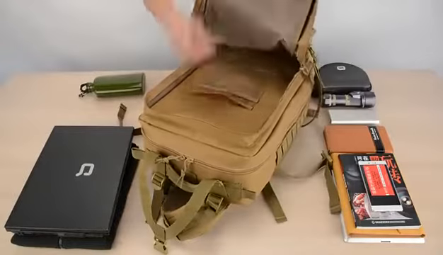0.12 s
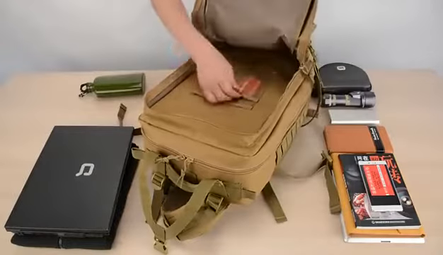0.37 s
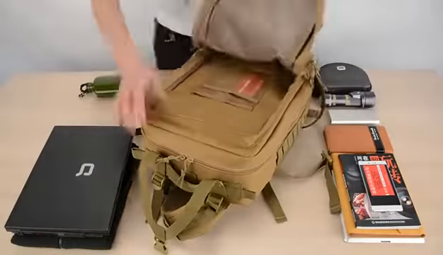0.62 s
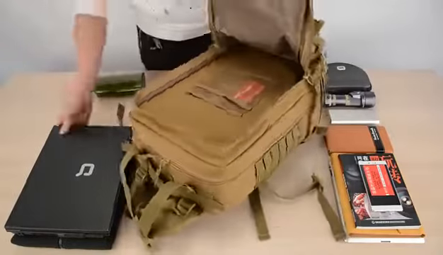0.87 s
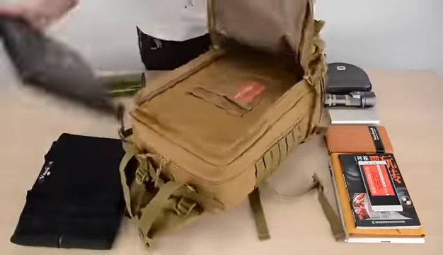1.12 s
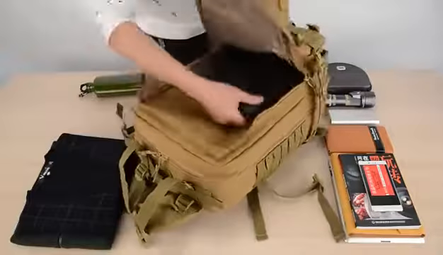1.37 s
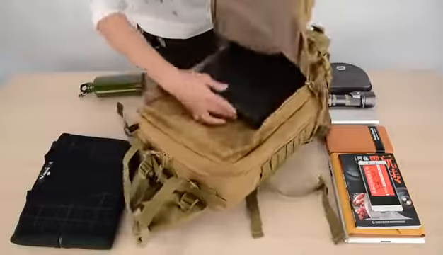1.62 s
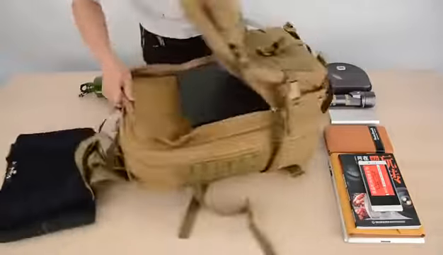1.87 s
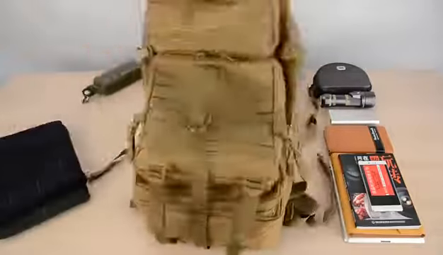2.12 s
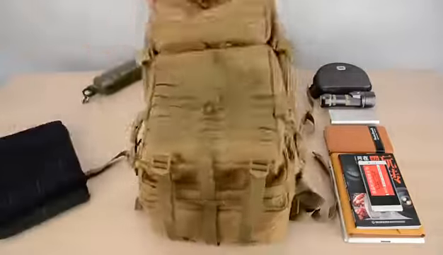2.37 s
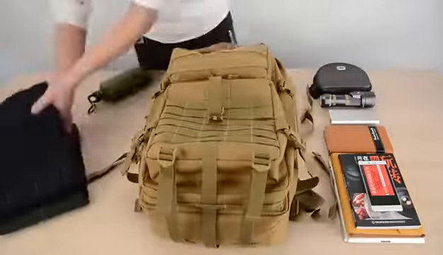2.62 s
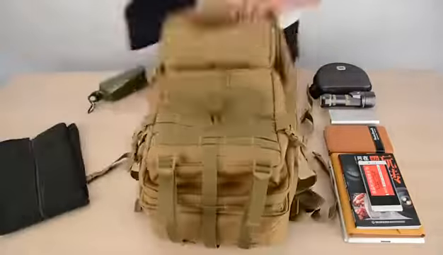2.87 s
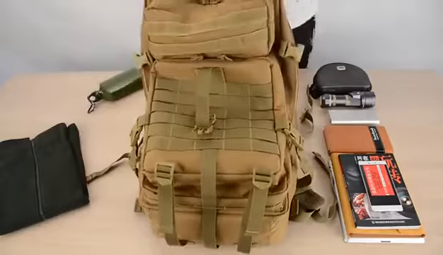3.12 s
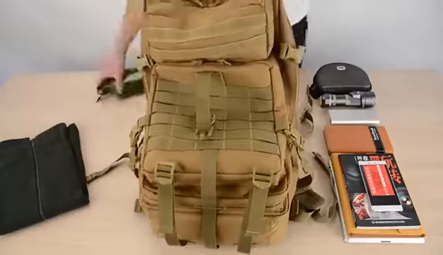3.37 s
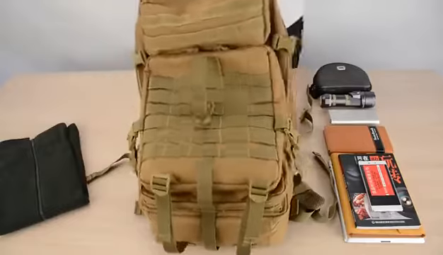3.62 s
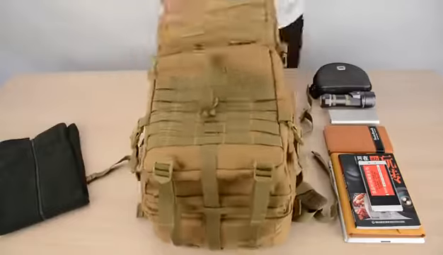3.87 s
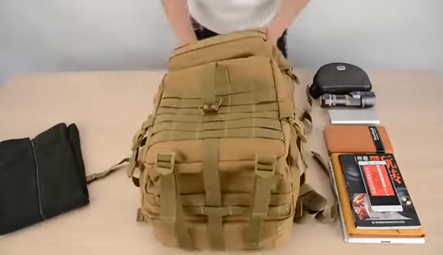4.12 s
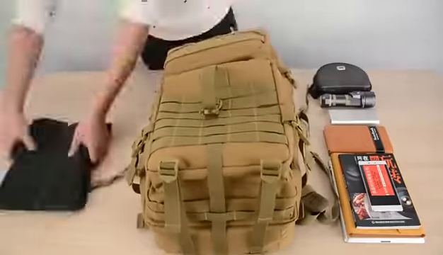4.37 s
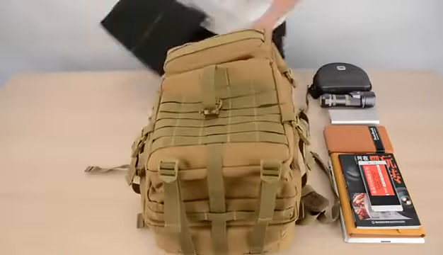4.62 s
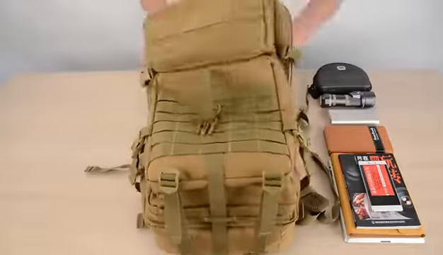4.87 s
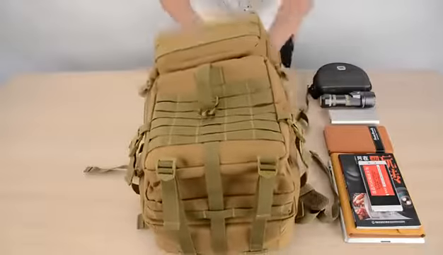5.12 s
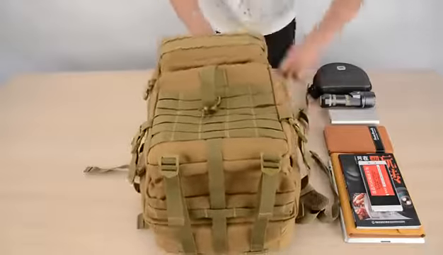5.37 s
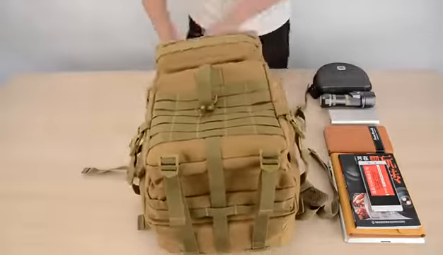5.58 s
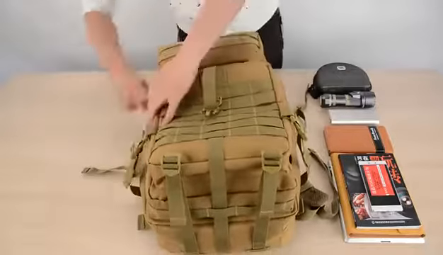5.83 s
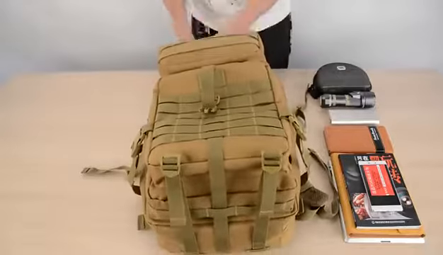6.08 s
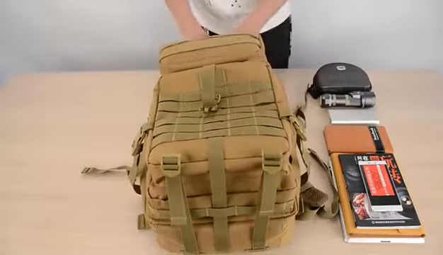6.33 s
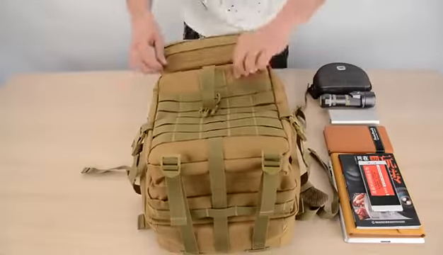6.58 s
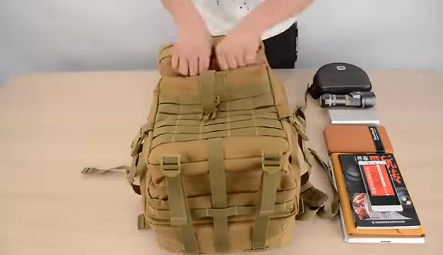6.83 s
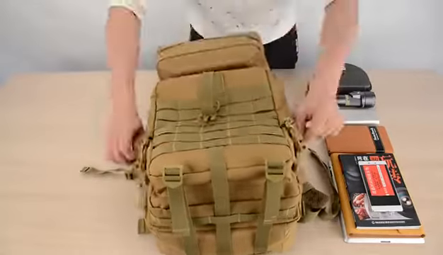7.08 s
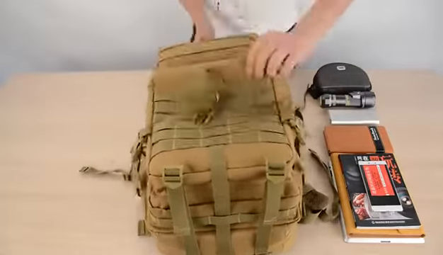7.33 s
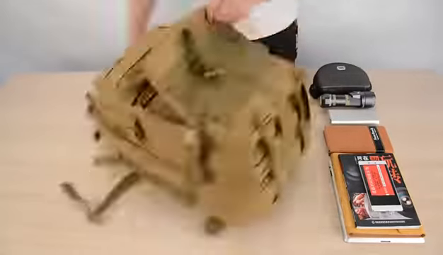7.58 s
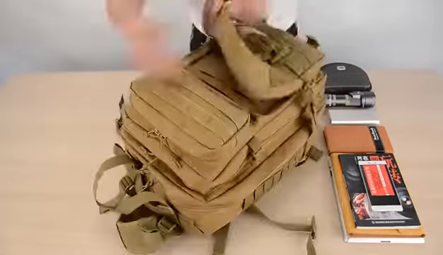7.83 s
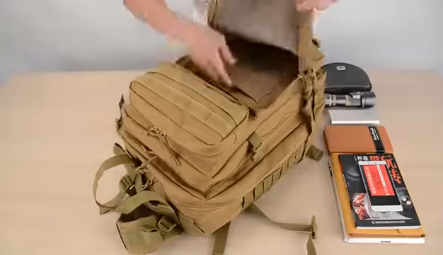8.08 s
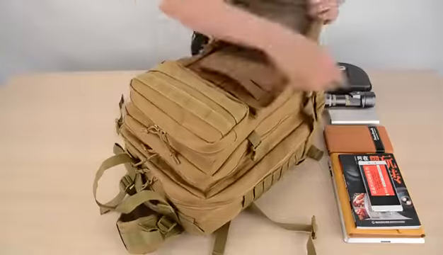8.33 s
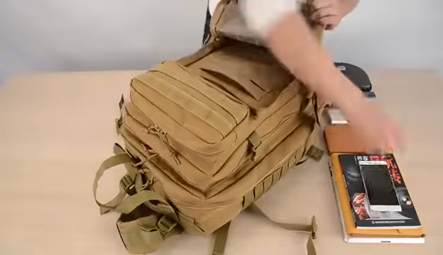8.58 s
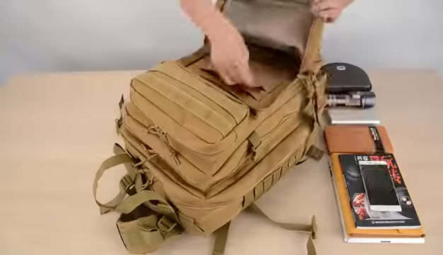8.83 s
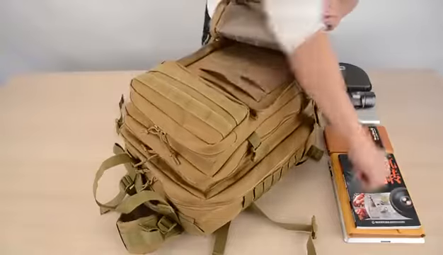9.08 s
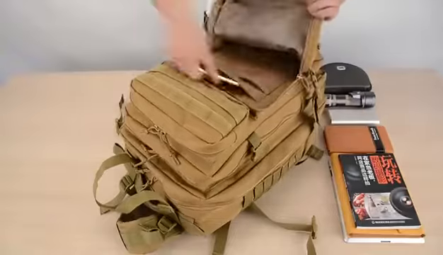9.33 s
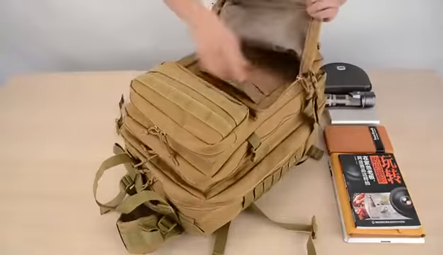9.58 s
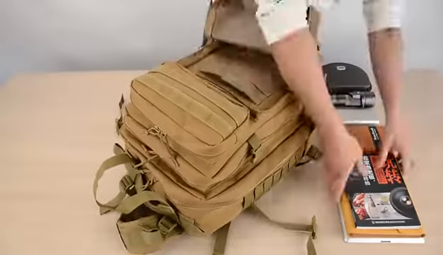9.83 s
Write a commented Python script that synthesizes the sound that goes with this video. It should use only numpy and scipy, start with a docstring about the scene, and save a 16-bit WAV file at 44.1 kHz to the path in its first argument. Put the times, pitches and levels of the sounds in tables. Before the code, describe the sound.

Sped-up hands pack a stiff nylon backpack on a wooden table in a small, hard room. From 0 to 1.7 s, dry crackling cloth rubs come with small clicks, including a sharper knock near 1.5. At 1.8-2.1 the bag is dragged, landing with a bright metal bottle clank and tiny rattle. Softer rustles and ticks follow, with a hard snap at 3.0 and a crisp scrape near 3.4. From 3.6 to 5.2 handling is lighter. Around 5.4-5.9, strong rubs and rapid zip whirrs burst out; shorter ones continue at 6.2-6.3. Vigorous scrapes and a knock come at 6.9-7.1, then dense clicks and a harsh drag at 7.4-7.8. Knocks near 8.1 give way to sparse clicks, quiet rustling and small zip rubs around 9.4. Thin mono microphone, little bass, faint hiss and drone, weak whistles at the end.

```python
"""Packing a stiff nylon backpack

Sped-up (time-lapse) sound of hands packing the bag on a wooden table in a small hard room, one thin microphone.
Cloth scrapes and crackles (dense random snaps, coloured), zips whirr (a gliding tone with overtones).
Buckles and packed things click and knock (damped rings); cloth resonances and short whirrs are noise bands.
A metal bottle clanks (decaying sines); thin whistles, hiss and a faint drone (shaped noise) lie behind.
"""
import sys
import numpy as np
from scipy import signal
from scipy.io import wavfile
from scipy.ndimage import uniform_filter1d

SR = 44100
rng = np.random.default_rng(int(sys.argv[2]) if len(sys.argv) > 2 else 0)


def put_to_file(sound):
    """Save the sound as 16-bit audio at rate SR, in the file named by the first command-line argument."""
    columns = np.atleast_2d(sound).T  # one column per channel
    safe = np.clip(columns, -1, 1)
    whole_steps = np.round(safe * 32767)
    wavfile.write(sys.argv[1], SR, whole_steps.astype(np.int16))


def nominal_scale(level):
    """Amplitude ratio for a level in decibels (scalar or array-like)."""
    x = np.asarray(level, float) / 20
    return 10 ** x


N = 438794

# Hand sweeps over the cloth: (loudest [s], swell [s], fade [s], level [dB], brightness [dB])
STROKES = [(.05, 0.094, 0.039, -45.5, 1), (.138, 0.024, 0.026, -38, 3.5), (.36, .1, 0.091, -50.5, 2),
           (0.598, 0.18, 0.14, -46, 3.5), (.742, .1, 0.043, -41, 0.5), (.87, 0.088, 0.096, -39, 5),
           (1.097, 0.018, 0.036, -46.5, 3.5), (1.369, 0.059, 0.09, -34, 0.5),
           (1.605, 0.25, 0.043, -46.5, 1.5), (1.702, 0.079, 0.082, -40.5, 2), (2.327, 0.083, .12, -50, 2),
           (2.397, 0.037, .1, -41.5, 0), (2.48, 0.026, .05, -44, 1.5), (2.91, 0.24, 0.55, -45, 1),
           (3.366, 0.013, 0.087, -31.5, 4.5), (3.618, 0.078, .2, -41, 2), (3.81, 0.043, 0.046, -41.5, -3),
           (3.872, .06, 0.033, -42.5, 2.5), (4.099, 0.06, 0.052, -42, -0.5), (4.224, 0.074, .08, -40, 2),
           (4.413, 0.083, 0.21, -43, 2.5), (4.83, .1, 0.18, -48, -0.5), (5.378, 0.027, 0.073, -29, 3.5),
           (5.405, 0.041, 0.085, -25.5, 3.5), (5.582, 0.022, 0.076, -29, 1.5),
           (5.849, 0.04, 0.062, -30, 4.5), (5.885, 0.037, 0.044, -29.5, 3), (5.95, 0.081, 0.041, -37.5, -1),
           (6.15, 0.024, 0.035, -43.5, -0.5), (6.192, .02, .045, -34, 4.5), (6.325, 0.024, 0.018, -32, -2),
           (6.706, 0.0097, 0.062, -37, 2), (6.854, 0.44, 0.9, -43.5, -6), (6.91, 0.016, 0.11, -34.5, 2.5),
           (6.95, 0.044, .08, -28.5, 4), (6.995, .08, .045, -30.5, 4), (7.055, 0.025, 0.073, -28, 3),
           (7.11, .09, 0.068, -31.5, 3.5), (7.343, 0.033, .3, -43.5, -0.5), (7.485, 0.12, .3, -40.5, 0),
           (7.912, 0.13, .09, -41.5, -1), (8.151, 0.038, 0.071, -36, -2), (8.329, 0.027, 0.029, -44.5, 0),
           (8.796, 0.035, .06, -38.5, 2), (9.347, 0.067, 0.11, -46, -3), (9.444, 0.063, 0.22, -39, 2.5),
           (9.493, 0.075, 0.029, -44.5, -11), (9.566, 0.031, 0.027, -36.7, 0.)]
# Cloth jerked taut or slapped: (time [s], fade [s], level [dB], brightness [dB])
JOLTS = [(0.513, 0.012, -34.5, -3.5), (1.029, .055, -40, 6), (1.292, 0.026, -36, -2.5),
         (1.472, 0.038, -28, -0.5), (2.05, 0.2, -29, 3.5), (2.09, 0.079, -25, 5.5), (2.914, .03, -35.5, 1),
         (3.037, 0.047, -31, 3.5), (3.555, 0.051, -34.5, 1), (4.615, 0.24, -41, 1),
         (5.708, 0.039, -37.5, 2.5), (7.302, 0.037, -42, 0.5), (7.42, 0.038, -30, 4.5),
         (8.078, 0.041, -36.5, -3.5), (8.13, 0.17, -38, -2.5)]
# Whole bag dragged round on the table: (start [s], end [s], level [dB], brightness [dB])
DRAGS = [(1.773, 2.067, -34, 3.5), (7.54, 7.806, -29.5, 5)]
# The bag never rests: (time [s], fidgeting level [dB])
FIDGET = [(0, -51.5), (.5, -50), (1.2, -49), (1.6, -48), (2.3, -56), (2.6, -51), (3.2, -51), (4, -49.5),
          (4.7, -53), (5.3, -46.5), (5.75, -46.5), (6.05, -48.5), (6.5, -47.5), (7.26, -56.5), (8, -46.5),
          (8.4, -49.5), (9.3, -49), (9.95, -50.5)]
# Cloth colour, relative: (frequency [Hz], level [dB])
CLOTH_COLOUR = [(60, -47.5), (250, -31.5), (500, -8.5), (1000, -3), (2000, 1), (3300, 1.5), (5000, 0.5),
                (7600, -1)]
# Clicks and knocks: (time [s], blow peak [dB], pitch of struck part [Hz], tail re blow peak [dB])
KNOCKS = [(0.0483, -31.5, 5220, -4), (0.1351, -35, 5500, -12), (0.5134, -34, 4200, -2.5),
          (0.711, -29, 5530, -12), (1.0262, -22.5, 4400, -15), (1.289, -21.5, 2840, -21),
          (1.3714, -19, 4180, -14), (1.4706, -12, 4970, -27), (1.6485, -28, 5950, -9),
          (2.0497, -19, 3320, -19), (2.3481, -22, 5860, -15), (2.396, -18.5, 5000, -26),
          (2.838, -33, 3010, -7.5), (2.8613, -21, 2520, -20), (2.9113, -22, 3770, -17),
          (2.9392, -21.5, 3490, -23), (3.032, -7, 2650, -22), (3.0343, -10.5, 6540, -17.5),
          (3.2838, -23.5, 4930, -27), (3.5523, -30, 2870, -9), (3.6164, -18.5, 5400, -17),
          (3.671, -29, 5850, -6), (3.7777, -20.5, 5980, -18), (3.8038, -24.5, 3580, -14.5),
          (4.097, -29, 5400, -20), (4.1809, -39, 4220, -28), (4.6116, -27.5, 4200, -10),
          (4.684, -24, 5700, -31), (4.7144, -25, 4370, -24), (5.178, -28, 5060, -14),
          (5.5737, -18, 3870, -6), (5.7054, -28, 3600, -12), (5.7663, -32, 2730, -12),
          (6.0424, -21, 4460, -18.5), (6.4764, -29, 3090, -9), (6.8513, -19, 4720, -12),
          (7.1171, -12, 2140, -21), (7.3086, -17, 2920, -16.5), (7.3442, -20, 4570, -20),
          (7.4185, -20, 7150, -23), (7.4634, -21, 4530, -16), (7.482, -15, 4090, -19),
          (7.5351, -6, 6440, -20), (7.5494, -21, 6600, -12), (7.8858, -28, 2700, -13),
          (7.9052, -21.5, 2780, -13.5), (8.0773, -12.5, 2880, -19), (8.1444, -11.5, 3840, -9),
          (8.3035, -19.5, 3600, -18), (8.6077, -26.5, 7400, -11.5), (8.7918, -21, 5460, -18),
          (8.9219, -24.5, 1360, -27), (9.3025, -27.5, 1210, -15), (9.485, -28, 2900, -17),
          (9.5621, -28, 2200, -12), (9.745, -26.5, 2800, -15)]
# Zip pulls or rubs across ribbed webbing:
# (fastest [s], speeding up [s], slowing [s], top tooth rate [Hz], level [dB])
PULLS = [(5.402, .03, 0.074, 2425, -31.5), (5.868, 0.045, 0.046, 2554, -25),
         (6.197, 0.022, 0.025, 1142, -41), (6.334, 0.035, 0.026, 2240, -38),
         (6.935, 0.047, 0.063, 2240, -45), (7.115, .12, 0.041, 1194, -40), (9.347, .016, 0.024, 2484, -33),
         (9.442, 0.018, 0.021, 1347, -37.5)]
# Tooth-rate overtones: (multiple [1], level [dB])
TOOTH_OVERTONES = [(1, -5.5), (2, -19), (3, -18.5)]
# Narrow noisy bands, cloth resonances and short zip whirrs of nearly steady pitch:
# (start [s], end [s], frequency [Hz], width [Hz], level [dB])
NARROW_BANDS = [(.845, .925, 4440, 500, -43.5), (3.033, 3.08, 2570, 440, -42),
                (3.033, 3.06, 4960, 500, -42), (3.355, 3.39, 1960, 352, -38),
                (5.385, 5.425, 4380, 710, -29), (5.574, 5.605, 3860, 920, -24.5),
                (5.585, 5.61, 2500, 250, -29.5), (5.598, 5.64, 1770, 220, -37.5),
                (6.178, 6.215, 4360, 800, -38), (6.31, 6.348, 4630, 900, -36),
                (6.93, 6.97, 4700, 607, -31.5), (7.07, 7.11, 2230, 302, -34), (7.55, 7.7, 6820, 690, -31.5),
                (8.155, 8.212, 4280, 250, -37.5), (8.315, 8.36, 4040, 400, -46),
                (9.486, 9.506, 2170, 300, -40.5)]
# Bottle modes, relative: (frequency [Hz], level [dB], t60 [s])
BOTTLE_MODES = [(5320, -1.5, 0.046), (5570, 6, .07), (6960, 5, 0.045), (7600, -5, .06)]
# Blows on the bottle, relative: (time [s], blow [dB])
CLANKS = [(2.0827, -13), (2.084, -20), (2.091, -24), (2.099, -15), (2.108, -17), (2.149, -25)]
# The bag lands on the table, one row: (time [s], level [dB], frequency [Hz], t60 [s])
THUMP = (2.082, -37, 260, .012)
# Thin faint tones: (start [s], end [s], frequency [Hz], level [dB])
WHISTLES = [(3.18, 3.27, 6400, -52), (9.82, 9.87, 5715, -57), (9.875, 9.95, 5715, -52),
            (9.83, 9.92, 6654, -56), (9.86, 9.95, 2223, -56), (9.83, 9.94, 4436, -59),
            (9.38, 9.42, 690, -51)]
# Room decay: (frequency [Hz], t60 [s])
ROOM_DECAY = [(500, 0.26), (2000, 0.083), (7000, 0.062)]
# Hiss density, relative: (frequency [Hz], level [dB per Hz])
HISS_COLOUR = [(15, -51.5), (25, -29.5), (182, -14), (220, -20), (323, -5), (534, -7.5), (1180, -8),
               (1490, -1), (2040, 0), (3210, -7.5), (4280, -8.5), (4600, -3.5), (7600, -16), (9880, -39),
               (16700, -120)]
# Faint drone of the room: (frequency [Hz], level [dB])
HUM = [(100, -86), (199, -82), (312, -79), (361, -77), (415, -73), (592, -72), (694, -73), (840, -70)]

HISS_DB = -55
EDGE_HZ = 7700
LOW_CUT_HZ = 526  # handling sounds keep little bass below this
SWING_DB, JOLT_RISE_S = 15, 0.005  # swell and fade times span about SWING_DB
ROUND = 0.07  # bluntness of a stroke's top
DRAG_SAG_DB_PER_S, DRAG_FADE_S = 13, 0.063  # a drag tires, then stops
# Brightness lowers folds below 3.3 kHz and raises weave above 4 kHz by these shares
FIDGET_BRIGHT_DB, FOLDS_SHARE, WEAVE_SHARE = -2.5, 1.09, 0.7
SLOWEST, SLOW_DB = 0.5, -8  # speed re top and level change at both ends of a pull


def evened(x):
    """Scales to rms 1."""
    return x / np.sqrt(np.mean(abs(x) ** 2) + 1e-20)


def read(points, hz):
    """Interpolates a table on a log-frequency axis."""
    f, value = np.transpose(points)
    return np.interp(np.log(hz + 1), np.log(f + 1), value)


def add(mix, start_s, sound):
    """Mixes a sound in at start_s."""
    part = mix[round(start_s * SR):][:len(sound)]
    part += sound[:len(part)]


def resonate(x, hz, width_hz):
    """Resonance of gain 1: shift hz to zero, one-pole low-pass, shift back."""
    turn = np.exp(2j * np.pi * np.cumsum(hz * np.ones(len(x))) / SR)
    r = np.exp(-np.pi * width_hz / SR)
    return 2 * (turn * signal.lfilter([1 - r], [1, -r], x / turn)).real


def patches(shape, bins, frames):
    """Blotchy random field of rms 1 over frequency and time."""
    field = rng.standard_normal(shape[::-1]).T
    return evened(uniform_filter1d(uniform_filter1d(field, bins, 0), frames, 1))


def bands(rows, taper):
    """Narrow bands of noise that swell and fade."""
    out = np.zeros(N)
    noises = rng.standard_normal((len(rows), SR // 4))
    for (start_s, end_s, hz, width_hz, db), noise in zip(rows, noises):
        count = round((end_s - start_s) * SR)
        ringing = resonate(resonate(noise, hz, width_hz), hz, width_hz)
        tone = evened(ringing[-count:])  # resonance already built up
        add(out, start_s, nominal_scale(db) * tone * signal.windows.tukey(count, taper))
    return out


def hump_db(t, peak_s, swell_s, fade_s):
    """Level bump of a rub: blunt top, straight flanks in dB."""
    away = np.where(t < peak_s, (peak_s - t) / swell_s, (t - peak_s) / fade_s)
    return -SWING_DB * (np.hypot(away, ROUND) - ROUND)


def rubbing(t):
    """Cloth gain and brightness: strokes, jolts and drags add power to the fidgeting."""
    parts = [(np.interp(t, *np.transpose(FIDGET)), FIDGET_BRIGHT_DB)]
    for s, swell_s, fade_s, db, bright_db in STROKES:
        parts.append((db + hump_db(t, s, swell_s, fade_s), bright_db))
    for s, fade_s, db, bright_db in JOLTS:
        parts.append((db + hump_db(t, s, JOLT_RISE_S, fade_s), bright_db))
    for start_s, end_s, db, bright_db in DRAGS:
        sag_db = hump_db(t, start_s, JOLT_RISE_S, SWING_DB / DRAG_SAG_DB_PER_S)
        stop_db = hump_db(t, end_s, np.inf, DRAG_FADE_S)
        parts.append((db + sag_db + stop_db, bright_db))
    power = np.array([nominal_scale(db) ** 2 for db, _ in parts])
    total = power.sum(0)
    return np.sqrt(total), np.array([bright_db for _, bright_db in parts]) @ power / total


def cloth(snaps_hz=12000.0, spread_db=1.5, clump_db=1.0, patchy_db=1.5, streak_db=2.8):
    """Weave threads slip in dense uneven snaps; folds and weave set the colour."""
    s = np.arange(0, N, 32) / SR
    level, bright_db = rubbing(s)
    snaps = (rng.random(N) < snaps_hz / SR) * rng.standard_normal(N)
    snaps = snaps * nominal_scale(spread_db * np.minimum(rng.exponential(1, N), 4))
    hz, t, z = signal.stft(snaps, SR, nperseg=256, noverlap=192)

    folds = np.clip(np.log2(3300 / (hz + 1)), 0, 1.3)[:, None]
    weave = np.clip(np.log2((hz + 1) / 4000) * 2.07, 0, 1.2)[:, None]
    tilt_db = (WEAVE_SHARE * weave - FOLDS_SHARE * folds) * np.interp(t, s, bright_db)
    colour = nominal_scale(read(CLOTH_COLOUR, hz)[:, None] + tilt_db)
    inside = hz < EDGE_HZ
    colour = colour / np.sqrt((colour[inside] ** 2).mean(0)) * inside[:, None]  # even power per frame

    z = z * colour * nominal_scale(patchy_db * patches(z.shape, bins=6, frames=14))
    z = z * nominal_scale(streak_db * patches(z.shape, bins=1, frames=30))  # small creases ring for a moment
    scrape = evened(signal.istft(z, nperseg=256, noverlap=192)[1][:N])
    # the grip catches and lets go
    clumps = evened(uniform_filter1d(uniform_filter1d(rng.standard_normal(N), size=160), size=120))
    return scrape * np.interp(np.arange(N) / SR, s, level) * nominal_scale(clump_db * clumps)


def knocks(ring_width_hz=600.0, crack_db=16.0, crack_hz=3500.0, tail_width_hz=640.0, tail_t60_s=0.064):
    """Each blow: sharp crack, damped ring of the struck part, rougher tail around the same pitch."""
    out, t = np.zeros(N), np.arange(SR // 4) / SR
    noises = rng.standard_normal((len(KNOCKS), 2, len(t)))
    for (s, peak_db, hz, tail_db), (blow_noise, tail_noise) in zip(KNOCKS, noises):
        contact = np.gradient((np.sign(blow_noise) + blow_noise) * np.exp(-t / 0.0008))
        ring = resonate(contact, hz, ring_width_hz)
        crack = resonate(contact, crack_hz, 4000)
        blow = nominal_scale(crack_db) * crack / abs(crack).max() + ring / abs(ring).max()
        rough = evened(resonate(resonate(tail_noise, hz, tail_width_hz), hz, tail_width_hz))
        tail = rough * nominal_scale(tail_db - 60 * t / tail_t60_s)
        add(out, s, nominal_scale(peak_db) * (blow / abs(blow).max() + tail))
    return out


def zips(jitter_hz=100.0, rough=0.55):
    """The slider runs over the teeth: rough whistle at the tooth rate and its overtones."""
    out = np.zeros(N)
    for s, up_s, down_s, top_hz, db in PULLS:
        t = np.arange(-up_s, down_s, 1 / SR)
        lag = np.where(t < 0, t / up_s, t / down_s) ** 2  # 0 at full speed, 1 at both ends
        noises = rng.standard_normal((2, SR // 4))
        wobble, grit = (evened(uniform_filter1d(v, size=90))[:len(t)] for v in noises)
        tooth_hz = top_hz * (1 - (1 - SLOWEST) * lag) + jitter_hz * wobble
        turns = np.cumsum(tooth_hz) / SR
        teeth = sum(nominal_scale(k_db) * np.sin(2 * np.pi * k * turns) for k, k_db in TOOTH_OVERTONES)
        swing = np.sqrt(2) * (1 + rough * grit) * signal.windows.tukey(len(t), 0.3)
        add(out, s - up_s, teeth * swing * nominal_scale(db + SLOW_DB * lag))
    return out


def narrow_bands():
    """Narrow noisy bands: cloth resonances, and short zip whirrs of nearly steady pitch."""
    return bands(NARROW_BANDS, taper=0.37)


def bottle():
    """Metal bottle struck and rattling as the bag lands: decaying modes, plus a low thump."""
    out, t = np.zeros(N), np.arange(SR // 4) / SR
    all_phases = rng.random((len(CLANKS), len(BOTTLE_MODES)))
    for (s, blow_db), phases in zip(CLANKS, all_phases):
        modes = sum(nominal_scale(db - 60 * t / t60_s) * np.sin(2 * np.pi * (hz * t + phase))
                    for (hz, db, t60_s), phase in zip(BOTTLE_MODES, phases))
        add(out, s, 0.5 * nominal_scale(blow_db) * modes * np.minimum(t / 0.0012, 1))
    s, db, hz, t60_s = THUMP
    add(out, s, nominal_scale(db - 60 * t / t60_s) * np.sin(2 * np.pi * hz * t))
    return out


def whistles(width_hz=40.0):
    """Thin wavering tones: very narrow noise bands."""
    rows = [(start_s, end_s, hz, width_hz, db) for start_s, end_s, hz, db in WHISTLES]
    return bands(rows, taper=0.17)


def room(x):
    """Sparse echoes of random sign, each band dying at its own speed."""
    taps, at = np.zeros(SR // 2), np.arange(150, SR // 2 - 20, 20)
    taps[at + rng.integers(0, 20, len(at))] = rng.choice([-1.0, 1.0], len(at))
    hz, t, z = signal.stft(taps, SR, nperseg=256)
    decay = nominal_scale(-60 * t / read(ROOM_DECAY, hz)[:, None])
    tail = signal.istft(z * decay, SR, nperseg=256)[1]
    return signal.fftconvolve(x, tail / np.linalg.norm(tail))[:N]


def hiss(patchy_db=1.2, streak_db=1.6):
    """Steady air of the room and microphone noise: coloured, slightly blotchy noise."""
    hz, t, z = signal.stft(rng.standard_normal(N), SR, nperseg=1024, noverlap=768)
    z = z * nominal_scale(read(HISS_COLOUR, hz)[:, None] + patchy_db * patches(z.shape, bins=10, frames=12))
    z = z * nominal_scale(streak_db * patches(z.shape, bins=2, frames=60))  # room resonances come and go
    return nominal_scale(HISS_DB) * evened(signal.istft(z, nperseg=1024, noverlap=768)[1][:N])


def hum(width_hz=14.0):
    """Faint drone of narrow wavering lines: noise through sharp resonances."""
    noises = rng.standard_normal((len(HUM), N))
    return sum(nominal_scale(db) * evened(resonate(v, hz, width_hz)) for (hz, db), v in zip(HUM, noises))


def scene():
    """Handling sounds gain the room and lose their bass; both channels are alike."""
    hard = knocks() + zips() + narrow_bands()
    soft = cloth()
    echoes = room(nominal_scale(-10) * hard + nominal_scale(-15.5) * soft)
    thin = signal.butter(N=3, Wn=LOW_CUT_HZ, btype="high", fs=SR, output="sos")
    handling = signal.sosfilt(thin, hard + soft + echoes)
    mix = handling + bottle() + whistles() + hiss() + hum()
    return np.array([mix, mix])


def top_cut(x):
    """Nothing passes above the cut-off."""
    return signal.sosfilt(signal.butter(12, 8930, fs=SR, output="sos"), x)


def record(dry):
    """Steep band limit at EDGE_HZ."""
    edge = signal.firwin(601, EDGE_HZ, window=("kaiser", 7), fs=SR)
    limited = signal.oaconvolve(dry, edge[None], "same")
    return top_cut(limited)


dry = scene()
out = record(dry)
put_to_file(out)
```